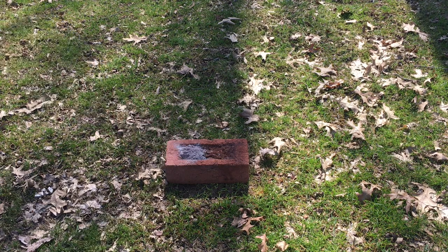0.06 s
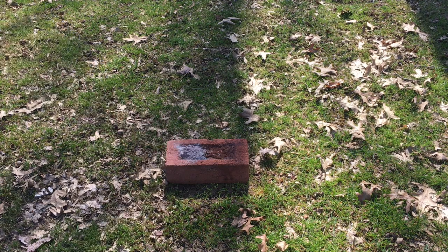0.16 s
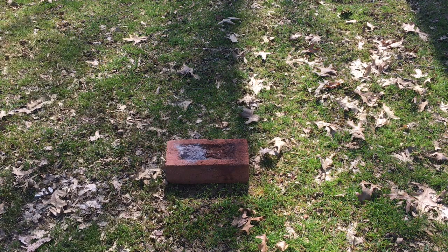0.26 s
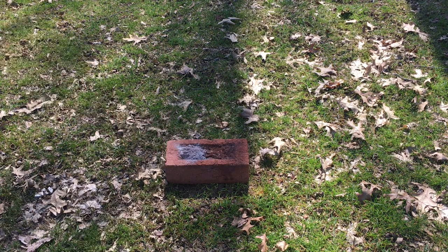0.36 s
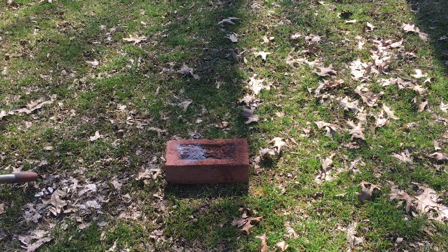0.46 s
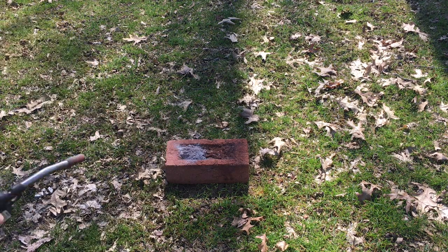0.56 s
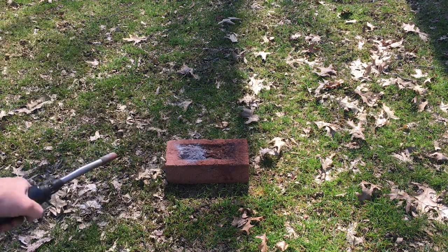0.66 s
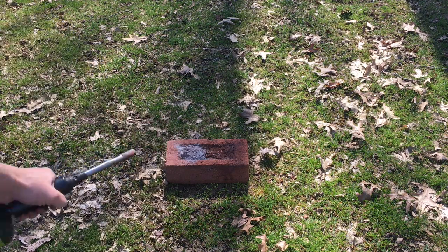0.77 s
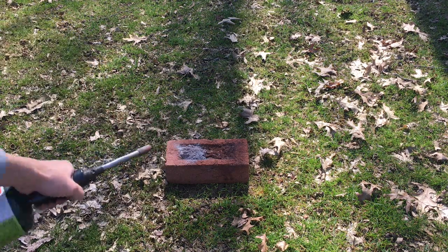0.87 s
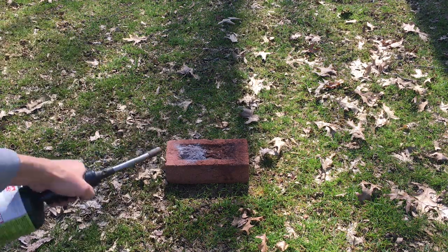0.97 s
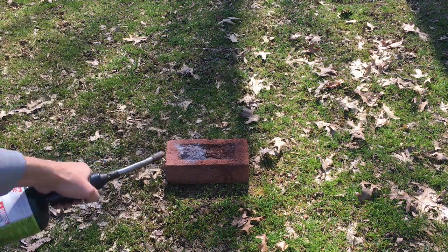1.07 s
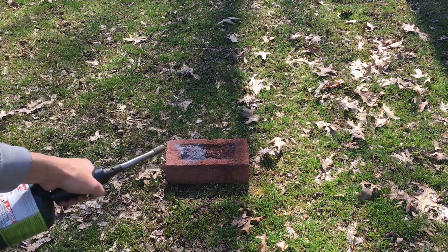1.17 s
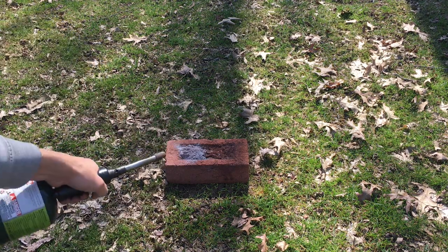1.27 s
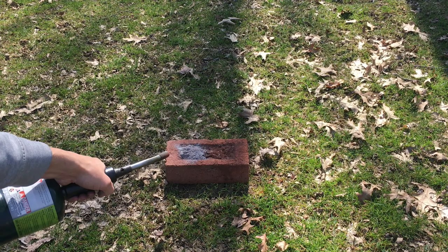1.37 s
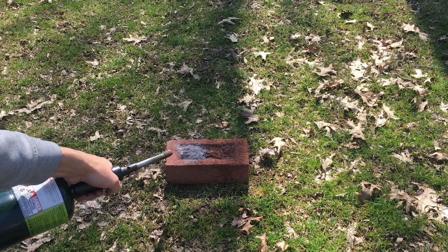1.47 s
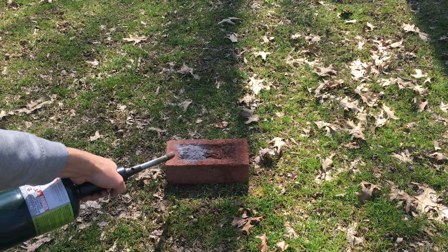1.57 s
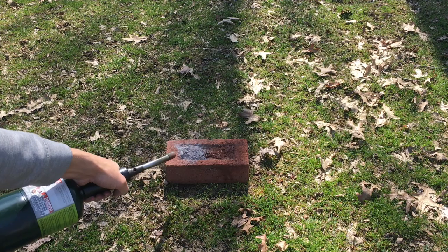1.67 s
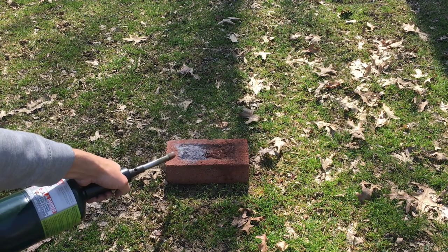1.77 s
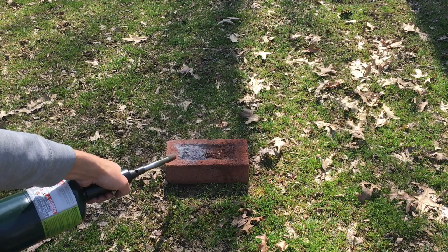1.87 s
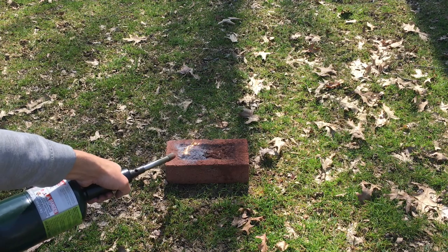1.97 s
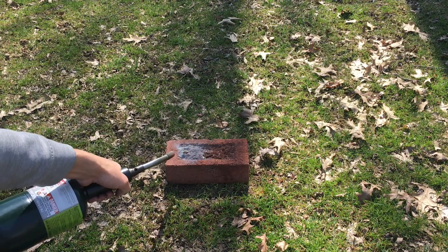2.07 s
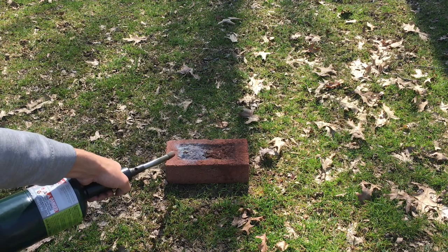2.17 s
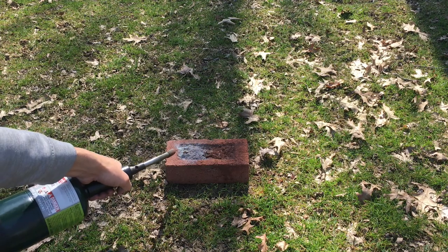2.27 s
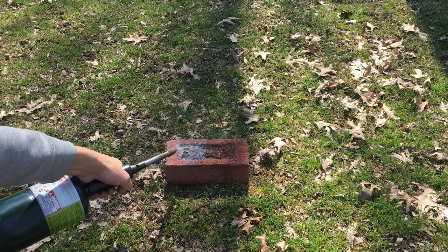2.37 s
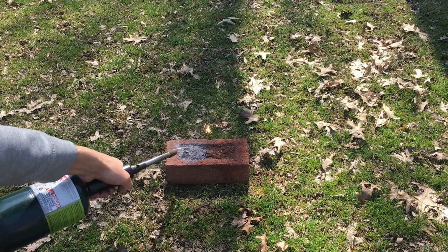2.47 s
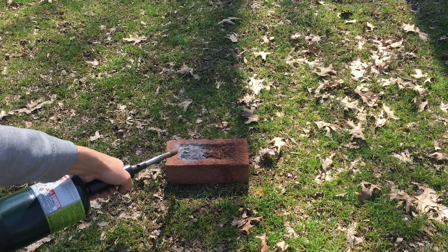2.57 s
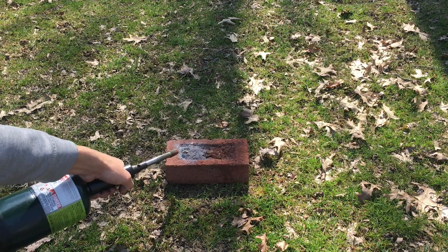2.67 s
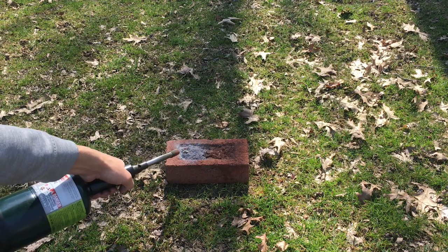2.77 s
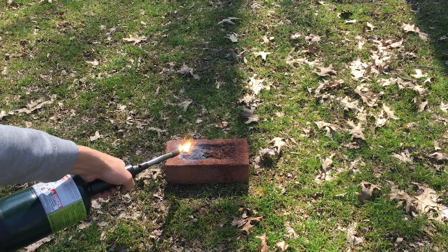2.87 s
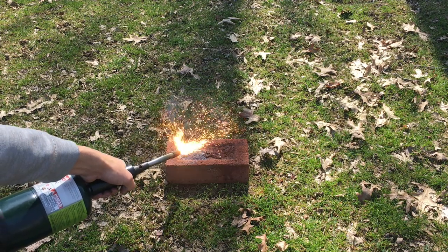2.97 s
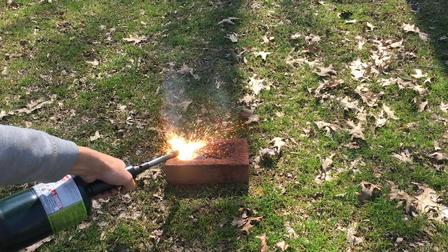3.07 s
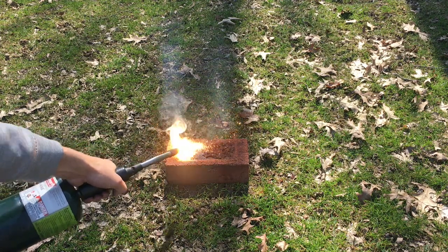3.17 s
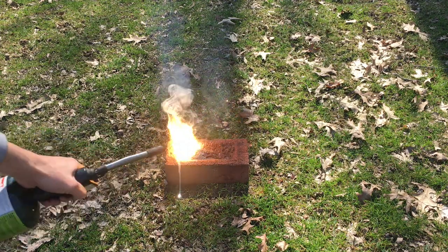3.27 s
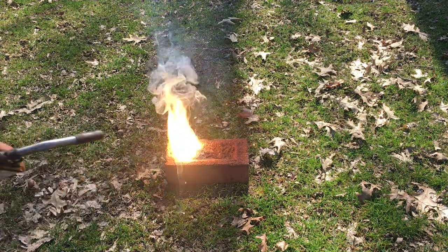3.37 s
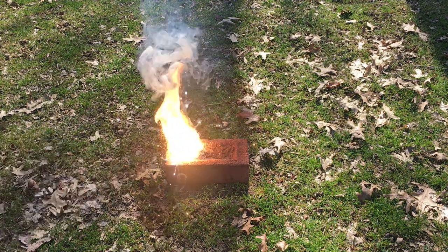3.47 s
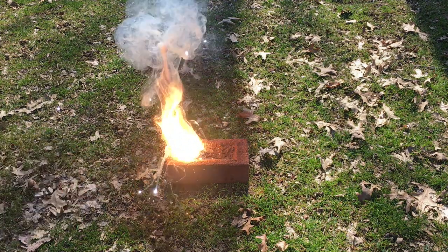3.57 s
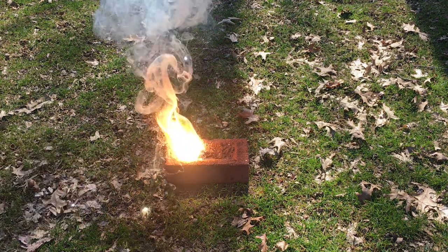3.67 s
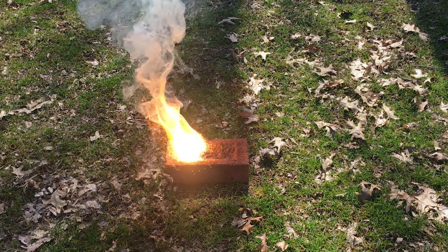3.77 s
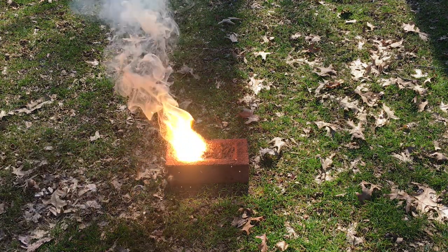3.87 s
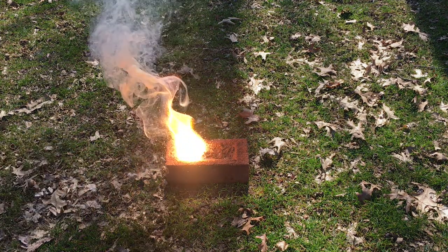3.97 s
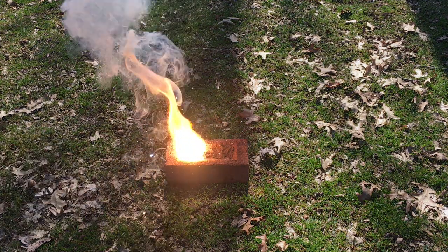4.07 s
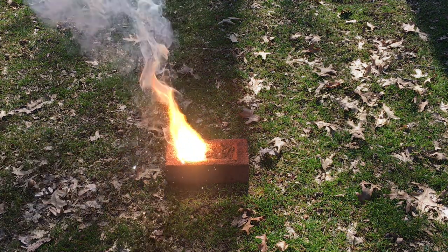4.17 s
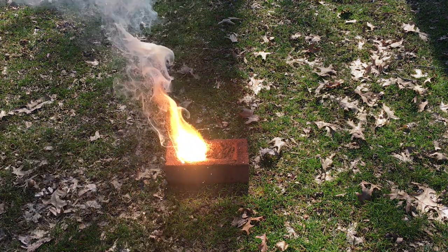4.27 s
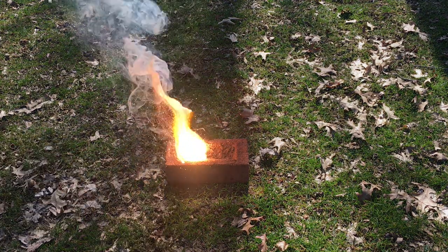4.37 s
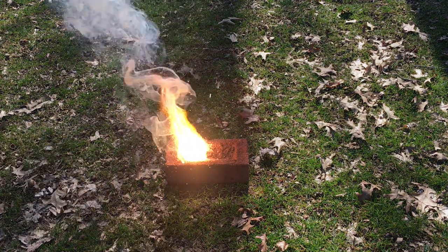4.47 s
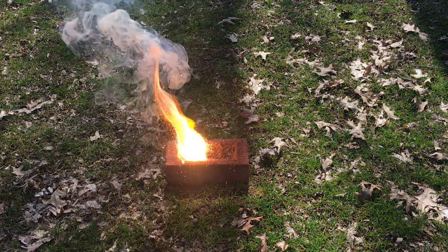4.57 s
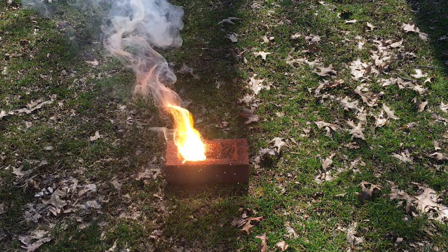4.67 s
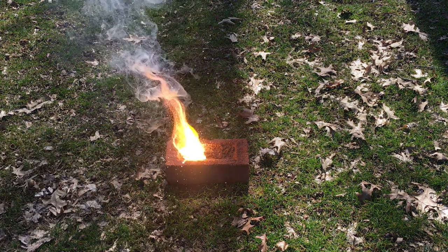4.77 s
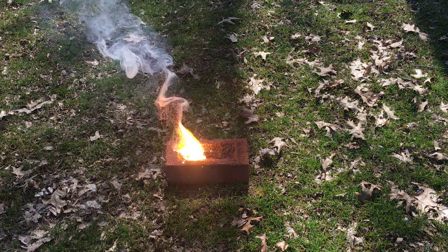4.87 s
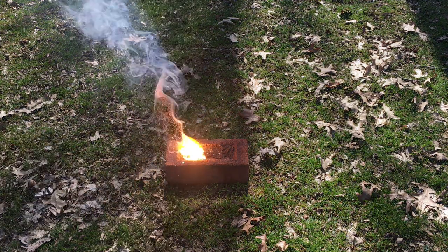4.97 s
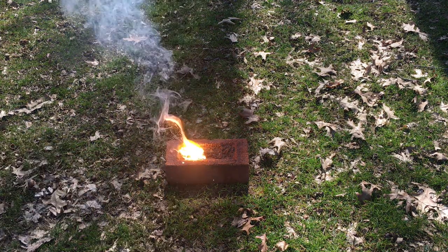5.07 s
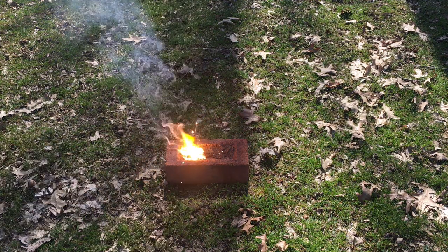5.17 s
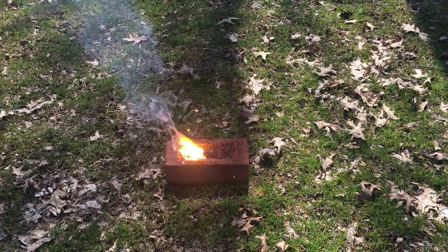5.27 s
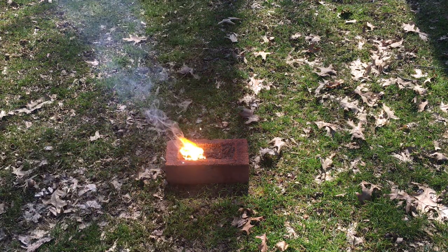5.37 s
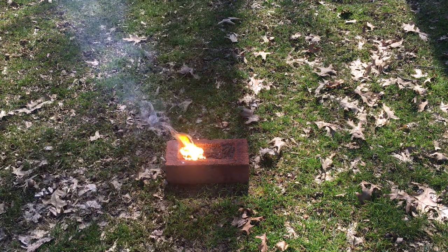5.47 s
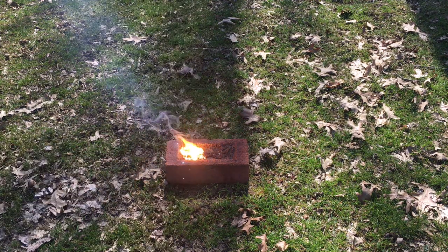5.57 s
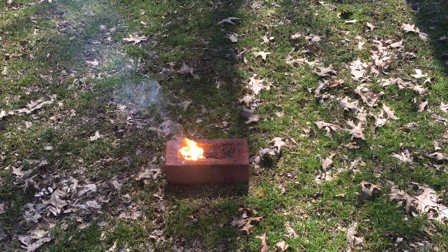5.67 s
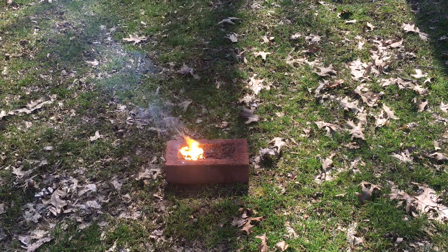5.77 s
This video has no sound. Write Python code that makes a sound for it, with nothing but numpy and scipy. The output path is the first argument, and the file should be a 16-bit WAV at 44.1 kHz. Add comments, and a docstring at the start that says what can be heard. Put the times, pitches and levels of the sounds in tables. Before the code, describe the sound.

Handling rustles, two igniter snaps, a steady torch roar, then a burst of cracking pops and hissing sparks that calms into bubbling crackle.

```python
"""Gas torch lights thermite on a lawn

A gas torch is picked up with rustles and knocks, hisses, is clicked twice and lights with a thump.
Its flame, turbulent noise ringing a burner tube, roars against a heap of thermite on a brick.
The powder catches: random clicks make the fizz, cracks with pressure pulses make the sharp pops.
It settles to a bubbling, crackling melt of uneven one-sided pulses, over a low outdoor rumble.
"""
import sys
import numpy as np
from scipy import signal
from scipy.fft import rfft, irfft
from scipy.io import wavfile
from scipy.ndimage import map_coordinates

SR = 44100
rng = np.random.default_rng(int(sys.argv[2]) if len(sys.argv) > 2 else 0)


def to_wav(sig):
    """Store sig (one row per channel, or 1-D mono) as 16-bit WAV at the path in sys.argv[1].

    Samples outside -1..1 are clipped; the rate is SR.
    """
    pcm = np.clip(np.atleast_2d(sig), -1, 1) * 32767
    pcm = np.round(pcm).astype(np.int16)
    wavfile.write(sys.argv[1], SR, pcm.T)  # frames by channels


N = 257103
T = np.arange(N) / SR
HZ = np.fft.rfftfreq(N, 1 / SR)

# squeezes of the gas trigger: opens t/s, closes t/s, level/dB
SQUEEZES = [(0.877, 1.09, -37), (1.191, 1.262, -34)]
VALVE_OPEN_S, VALVE_CLOSE_S, GAS_SAG_DB_PER_S = 0.084, 0.057, 43
WHISTLE_HZ, WHISTLE_GLIDE_HZ_PER_S, WHISTLE_DB = 5500, 1900, -45.5  # pitch as the valve opens

# the flame is lit, held on the heap, then turned away
LIT_S, AWAY_S, ROAR_DB, JET_DB = 1.25, 3.128, -30, -39.5
# speed of sound in the burner tube as a share of its hot value
COLD_SPEED, WARM_UP_S = .6, .39
# faint hum as the torch is drawn away; its octave is relative to the fundamental
HUM_HZ, HUM_DB, HUM_OCTAVE_DB, HUM_LENGTH_S = 143, -46, -8.5, 0.38

# the charge catches, flares up once, then burns down to a steady simmer
CATCH_S, GLITTER_END_S = 3.14, 4.8
SPREAD_S, MELTING_S = 0.31, 0.79  # time for the fire to cross the heap, and to melt it
SURGE_S, SURGE_HALF_S, SURGE_DB = 3.485, 0.14, -39
FIZZ_DB, FIZZ_FADE_DB_PER_S, FIZZ_SIMMER_DB = -41.5, 7.5, -54.5
MELT_DB, MELT_FADE_DB_PER_S, MELT_SIMMER_DB = -42.5, 26.5, -49.5
CALM_S, CALMING_S = 4.76, 1.15  # from here on the melt thickens into separate bubbles
SPITS_PER_S, SPITS_DB = 110, -5  # small random pops, level relative to the fizz
SPRAY_DECAY_S = 0.0026

AIR_DB = -43.5
EDGE_HZ = 15950  # upper band limit


def amp(db):
    """Decibels to gain."""
    return 10 ** (np.asarray(db) / 20)


def unit(x):
    """Scales to rms 1."""
    return x / np.sqrt(np.mean(x ** 2) + 1e-20)


def add(mix, s, sound):
    """Mixes a sound in at time s."""
    part = mix[max(round(s * SR), 0):][:len(sound)]
    part += sound[:len(part)]


def held(start, end, attack_s, release_s):
    """Envelope that rises from start, holds, and dies away after end."""
    rise = np.clip((T - start) / attack_s, 0, 1)
    return rise * np.exp(-np.maximum(T - end, 0) / release_s)


def swell(s, half_s):
    """Smooth rise and fall around time s."""
    return np.exp(-((T - s) / half_s) ** 2)


def colour(x, points):
    """Causal filter with the given spectrum, so clicks keep their sharp front; rms 1."""
    f, db = np.transpose(points)
    hz = abs(np.fft.fftfreq(4096, 1 / SR))
    log_gain = np.log(amp(np.interp(np.log(hz + 1), np.log(f), db)))
    # minimum phase: the phase follows from the log gain
    taps = np.fft.ifft(np.exp(np.conj(signal.hilbert(log_gain)))).real
    return unit(signal.oaconvolve(x, taps[:len(taps) // 2])[:N])


def ring(x, hz, width):
    """One resonance with gain 1 at its centre."""
    hz = min(hz, SR / 2 - 1000)
    return signal.lfilter(*signal.iirpeak(hz, hz / min(width, SR / 4), fs=SR), x)


def flutter(rate_hz, depth_db):
    """Random gain that wanders mostly below the given rate, by an rms depth in dB."""
    slow = irfft(rfft(rng.standard_normal(N)) / (1 + (HZ / rate_hz) ** 4), N)
    return amp(depth_db * unit(slow))


def sparks(per_s, spread_db):
    """Random clicks, mostly small and a few large; rms 1."""
    size = amp(spread_db * np.minimum(rng.exponential(1, N), 4.5))
    return unit(size * rng.choice([-1, 1], N) * (rng.random(N) < per_s / SR))


def echo(x, delay_ms, share, low_hz, high_hz):
    """Adds one near reflection that returns a band of the sound and combs it."""
    band = 1 / (1 + (HZ / high_hz) ** 4) / (1 + (low_hz / (HZ + 1)) ** 4)
    returned = irfft(rfft(x) * band, N)
    late = map_coordinates(returned, [np.arange(N) - delay_ms * SR / 1000], order=3)
    return x + share * late


def burn(glitter_db=-49, surge_glitter_db=-4, surge_melt_db=-13, plop_db=-5):
    """Sparks fizz over the seething melt; separate bubbles and ticks take over as it calms."""
    # spectra of the fizzing sparks and of the melt: f/Hz, relative level per Hz/dB
    fizz_spectrum = [(1500, -32), (3000, 5), (4500, -5), (6000, 4.5), (7700, -5), (9200, 2), (10500, -11),
                     (12000, -2), (14000, -31), (16000, -3)]
    melt_spectrum = [(150, -17), (400, -2), (650, -5.5), (820, -7), (1100, -1.5), (1600, 4), (2400, 2.5),
                     (3300, -7), (4800, -12), (9000, -29), (16000, -52)]
    # short sizzling flares: t/s, level/dB, f/Hz, half length/s
    flares = [(3.911, -41.5, 1070, 0.036), (4.024, -40.5, 1940, 0.096), (4.491, -39.5, 4300, 0.025)]
    alight = np.clip((T - CATCH_S) / SPREAD_S, 0, 1)
    molten = np.clip((T - CATCH_S) / MELTING_S, 0, 1)
    calm = np.clip(0.071 + 0.83 * np.clip((T - CALM_S) / CALMING_S, 0, 1), 0, 1)
    surge = amp(SURGE_DB) * swell(SURGE_S, SURGE_HALF_S)

    fizz_db = np.maximum(FIZZ_DB - FIZZ_FADE_DB_PER_S * (T - CATCH_S), FIZZ_SIMMER_DB)
    fizz_gain = np.hypot(alight * amp(fizz_db), surge)
    melt_db = np.maximum(MELT_DB - MELT_FADE_DB_PER_S * np.maximum(T - CALM_S, 0), MELT_SIMMER_DB)
    melt_gain = amp(surge_melt_db) * surge + molten * amp(melt_db)

    dense_and_sparse = np.sqrt(1 - calm) * sparks(9000, 1.9) + np.sqrt(calm) * sparks(600, 3.1)
    fizz = colour(dense_and_sparse, fizz_spectrum) * flutter(75, 3.2)
    spits = amp(SPITS_DB) * unit(ring(sparks(SPITS_PER_S, 1.2), 3500, 7000))
    # the finest sparks, only while it burns hard
    glitter = unit(ring(ring(sparks(5000, 5.6), 12000, 5500), 13500, 6500))
    melt = np.sqrt(1 - calm) * colour(sparks(3000, 3.56), melt_spectrum) * flutter(110, 1.6)
    bursts = bubbles()
    melt += np.sqrt(calm) * colour(bursts, melt_spectrum)
    melt += calm * amp(plop_db) * unit(ring(bursts, 350, 700))

    out = ((fizz + spits) * fizz_gain + melt * melt_gain) * flutter(16, 1.0)
    glitter_gain = amp(glitter_db) * held(CATCH_S, GLITTER_END_S, .08, .18)
    out += glitter * (glitter_gain + amp(surge_glitter_db) * surge)
    for s, db, hz, half in flares:
        sizzle = unit(ring(ring(sparks(5000, 3.9), hz, hz), hz, hz))
        out += amp(db) * sizzle * swell(s, half)
    return out


def bubbles(median_per_s=85, spread_db=4.5):
    """Gas bursts through the melt in an uneven run of one-sided pulses."""
    gap, size = rng.standard_normal((2000, 2)).T
    at = (np.cumsum(np.exp(.5 * gap)) / median_per_s * SR).astype(int)
    height = amp(spread_db * np.clip(size, -2, 1.3))
    inside = at < N
    return np.bincount(at[inside], height[inside], N)


def pops(crack_hz=7500, body_db=-7):
    """Each pop is a sharp crack, a short pressure pulse and a spray of sparks."""
    # pops: t/s, crack level/dB, pulse length/ms, spark spray before its filter, re crack/dB
    pop_list = [(3.152, -16, 0.039, -18), (3.233, -14, .05, -11), (3.3503, -15, 0.13, -5.5),
                (3.3776, -16, 0.1, -12), (3.459, -19, 0.2, -5), (3.4657, -16, .07, -10),
                (3.484, -5.5, 0.095, -12), (3.4917, -8, 0.036, -12), (3.4943, -8, .03, -9),
                (3.5118, -5, 0.016, -23), (3.5412, -6, 0.022, -12.5), (3.5464, -18, 0.037, -15),
                (3.5768, -18, 0.031, -11), (3.581, -10, 0.018, -33), (3.6978, -15.5, 0.054, -13),
                (3.8507, -2, 0.21, -20), (3.8838, -18, 0.12, -13), (4.1048, -11, 0.18, -17),
                (4.109, -5.5, 0.038, -10), (4.1679, 6.5, 0.45, -18), (4.2802, -21, 0.19, -8),
                (4.3802, -21, .04, -12), (4.5482, -19, 0.033, -13), (4.6701, -25, .08, -16),
                (4.7115, -23.5, .12, -6), (4.7903, -18, .13, -20), (4.794, -16, 0.22, -5.5),
                (4.8098, -24, .08, -8), (5.1817, -9.5, 0.1, -14.5), (5.2337, -26, 0.11, -18),
                (5.4907, -24, 0.11, -9.5), (5.511, -22.5, .068, -21), (5.5741, -25.5, 0.055, -7.5),
                (5.664, -20, .037, -15), (5.7046, -25, .087, -11), (5.7712, -24, 0.056, -13),
                (5.813, -25, .06, -15)]
    out = np.zeros(N)
    t = T[:SR // 12]
    cycles = t * crack_hz - 1.5
    crack = -np.cos(2 * np.pi * cycles) * np.exp(-(cycles / 0.42) ** 2)
    for s, db, length_ms, spray_db in pop_list:
        u = t / (length_ms / 1000)
        pulse = ring((1 - u) * np.exp(-u), 2600, 13000)  # overpressure, then a weaker suction
        body = amp(body_db) * pulse / abs(pulse).max()
        decay = np.exp(-t / SPRAY_DECAY_S) + 0.021 * np.exp(-t / 0.023)
        spray = ring(rng.standard_normal(len(t)) * decay, 5000, 14000)
        add(out, s, amp(db) * (crack + body + amp(spray_db) * spray))
    return out


def pushes():
    """Suddenly expanding gas gives a low thump of one or two swings."""
    # bursts that throw out a push of gas: t/s, level before decay/dB, f/Hz, decay time/s
    push_list = [(1.2483, -6.5, 165, 0.003), (3.851, -30, 458, 0.0011), (4.1694, -14, 424, 0.00049)]
    out = np.zeros(N)
    t = T[:SR // 10]
    for s, db, hz, decay in push_list:
        add(out, s, -amp(db) * np.sin(2 * np.pi * hz * t) * np.exp(-t / decay))
    return out


def flame():
    """Turbulent roar and jet hiss; the tube's resonances and its end echo rise in pitch with the heat."""
    # spectra of roar (when hot) and hiss: f/Hz, relative level per Hz/dB
    roar_spectrum = [(60, -17), (140, -1), (330, 0), (480, -2), (640, -2.5), (800, -3), (1400, 1),
                     (2200, -8), (3400, -24), (4500, -30.5), (9000, -45)]
    hiss_spectrum = [(2500, -2.5), (3400, 2), (4300, -33), (5400, 4.5), (7000, 0.5), (9200, 3.5),
                     (10500, -8.5), (11600, 4.5), (13500, -15.5), (16000, -22)]
    # resonances of the hot burner tube: f/Hz, width/Hz, relative level/dB
    hot_modes = [(2190, 700, 9), (3410, 1050, 9.5), (4650, 140, 4), (5070, 28, 11), (5980, 300, 11),
                 (7500, 460, 6), (8970, 370, -2), (9860, 200, 1.5), (12000, 120, 6), (12600, 150, 8)]
    # broad resonances that sound until the tube is hot: f when hot/Hz, width when hot/Hz, level/dB
    young_modes = [(2380, 1440, -37), (4540, 1300, -38.5), (7900, 4300, -44)]
    cold = np.exp(-(np.maximum(T - LIT_S, 0) / WARM_UP_S) ** 1.5)
    # share of the hot speed of sound; only the young flame wavers
    heat = (1 - (1 - COLD_SPEED) * cold) * flutter(21.95, .14) ** cold
    eddies = rng.standard_normal(N)
    tube = unit(sum(amp(db) * ring(eddies, hz, width) for hz, width, db in hot_modes))
    young = sum(amp(db) * unit(ring(ring(eddies, hz, width), hz, width)) for hz, width, db in young_modes)
    roar = colour(rng.standard_normal(N), roar_spectrum)
    # cooler gas plays the same modes slower
    place = [np.cumsum(heat)]
    roar, tube, young = [map_coordinates(x, place, order=3, mode="wrap") for x in (roar, tube, young)]

    roar = roar * flutter(70, 0.79) * amp(ROAR_DB - 2.7 * cold) * held(LIT_S, AWAY_S, 0.041, 0.057)
    young *= np.sqrt(cold) * held(LIT_S, AWAY_S, 0.089, .055)
    hiss = amp(-5) * colour(rng.standard_normal(N), hiss_spectrum) + amp(-3 * cold) * tube
    hiss *= flutter(57, .52) * amp(JET_DB) * held(LIT_S, AWAY_S, 0.0041, 0.15)
    near = echo(roar + young + hiss, 0.35 / heat, 0.6, 40, 4100)  # tube end
    return echo(near, 3.117, 0.37, 320, 1950)  # off the ground


def igniter(chatter_s=0.0026, tail_s=0.0014, direct_db=-4, spring_db=13):
    """The hammer chatters for a few ms and rings the tube and its spring; the trigger pings on release."""
    # igniter snaps: t/s, rms level over the first 4 ms/dB, tube pitch factor, inner spring f/Hz
    snaps = [(0.953, -12, 1.015, 8360), (1.2449, -11.5, 1.104, 11570)]
    # tube modes struck by the hammer: f before the pitch factor/Hz, width/Hz, relative level/dB
    struck_modes = [(975, 78, 8), (1350, 280, 1), (2140, 77, 16), (3370, 140, 11), (5780, 670, 1.5),
                    (7100, 770, 2), (9770, 1200, 6), (11600, 250, 11)]
    out = np.zeros(N)
    t = T[:SR // 8]
    tube_band = signal.butter(2, [650, 13000], "bandpass", fs=SR, output="sos")
    for s, db, pitch, spring_hz in snaps:
        chatter = rng.choice([-1, 1], len(t)) * np.exp(-np.maximum(t - chatter_s, 0) / tail_s)
        blow = signal.sosfilt(tube_band, chatter)
        snap = amp(direct_db) * blow + amp(spring_db) * ring(blow, spring_hz, 260)
        snap += sum(amp(mode_db) * ring(blow, hz * pitch, width) for hz, width, mode_db in struck_modes)
        add(out, s, amp(db) * snap / snap[:SR // 250].std())
    ping = ring(rng.standard_normal(len(t)) * np.exp(-t / 0.0018), 8130, 130)
    add(out, 1.0905, amp(-23.5) * ping / abs(ping).max())
    return out


def gas(tube_db=-5, jet_db=-2, tube_law=0.82):
    """The cold jet hisses and sounds the tube, even at low flow; squeeze one adds a fuzzy, rising whistle."""
    # spectrum of the cold jet: f/Hz, relative level per Hz/dB
    jet_spectrum = [(300, -31), (900, -4.5), (3000, 1), (7000, 6.5), (12500, 0), (16000, -15)]
    # resonances of the cold burner tube: f/Hz, width/Hz, relative level/dB
    cold_modes = [(942, 63, 21), (1580, 64, 7), (2170, 32, 17.5), (2330, 50, 8), (3350, 160, 0),
                  (6700, 140, -4), (9550, 400, -4), (11800, 250, -1.5), (12950, 250, -1)]
    jet = colour(rng.standard_normal(N), jet_spectrum)
    tube = unit(sum(amp(db) * ring(jet, hz, width) for hz, width, db in cold_modes))
    out = np.zeros(N)
    for opens, closes, db in SQUEEZES:
        sag = amp(-GAS_SAG_DB_PER_S * np.maximum(T - opens, 0))
        flow = held(opens, closes, VALVE_OPEN_S, VALVE_CLOSE_S) * sag
        out += amp(db) * (amp(jet_db) * jet * flow + amp(tube_db) * tube * flow ** tube_law)

    opens = SQUEEZES[0][0]
    pitch = WHISTLE_HZ + WHISTLE_GLIDE_HZ_PER_S * (T - opens)
    # slow complex noise blurs the tone into a narrow band
    noise = rng.standard_normal(N) + 1j * rng.standard_normal(N)
    fuzz = signal.sosfilt(signal.butter(2, 130, fs=SR, output="sos"), noise)
    whistle = unit((fuzz * np.exp(2j * np.pi * np.cumsum(pitch) / SR)).real)
    return out + whistle * amp(WHISTLE_DB) * held(opens, 1.04, 0.036, 0.047)


def handling(sleeve_db=-61, leaves_db=-67):
    """Grainy rustle, a sliding sleeve, small dead knocks and one faint ring of the bottle."""
    # spectrum of the rustle: f/Hz, relative level per Hz/dB
    rustle_spectrum = [(290, -50), (500, -12), (784, -5), (1160, -13), (1670, -9.5), (2890, -11),
                       (3250, -11), (6420, -11), (16000, -16.5)]
    # strokes of sleeve and leaves as the torch is lifted: start t/s, end t/s, level/dB
    stroke_list = [(0, 0.069, -50.5), (0.168, 0.265, -53.5), (0.335, 0.392, -52), (0.466, .503, -44.5)]
    # knocks and ticks of the torch and its trigger: t/s, peak level/dB, centre f/Hz, decay time/s
    knocks = [(.029, -33, 1950, .0025), (.045, -32, 2380, .0049), (.189, -34.5, 2430, .0011),
              (.213, -34.5, 1360, 0.0045), (.232, -27.5, 7800, .0015), (.474, -30.5, 845, 0.0025),
              (.495, -26.5, 6130, .0034), (.592, -23.5, 1290, 0.0014), (.592, -30.5, 9050, .0009),
              (0.677, -39.5, 6000, .003), (0.875, -30.5, 2500, 0.0031), (0.881, -31, 1240, 0.014),
              (1.091, -27.5, 1550, 0.0048), (1.184, -35, 2570, 0.0022), (1.1948, -29.5, 1670, 0.0044),
              (1.3963, -19, 8000, .001)]
    # modes of the gas bottle: f/Hz, width/Hz, relative level/dB
    bottle_modes = [(990, 28, 2.5), (1610, 8.7, -5), (2370, 16, 0)]
    moving = held(0.13, SQUEEZES[0][0], 0.036, .03)
    strokes = sum(amp(db) * held(start, end, 0.0052, 0.0093) for start, end, db in stroke_list)
    out = colour(sparks(6000, 5.1), rustle_spectrum) * (strokes + amp(leaves_db) * moving)
    sleeve = unit(ring(ring(rng.standard_normal(N), 1600, 2200), 1300, 5800))
    out += sleeve * amp(sleeve_db) * moving
    t = T[:SR // 4]
    for s, db, hz, decay in knocks:
        blow = rng.standard_normal(len(t)) * np.exp(-t / decay)
        knock = ring(ring(blow, hz, 0.7 * hz), hz, 3.2 * hz)
        add(out, s, amp(db) * knock / abs(knock).max())
    bottle = sum(amp(db) * np.sin(2 * np.pi * hz * t) * np.exp(-np.pi * width * t)
                 for hz, width, db in bottle_modes)
    add(out, .044, amp(-46) * bottle)
    return out


def outdoors():
    """Steady low rumble of the open air, with a faint hum that passes as the torch is drawn away."""
    # spectrum of the outdoor background: f/Hz, relative level per Hz/dB
    air_spectrum = [(20, -46), (40, -5.5), (60, 2), (105, -1), (150, -8), (230, -12), (350, -18.5),
                    (700, -33.5), (2000, -32), (6000, -43), (16000, -44)]
    turns = np.cumsum(HUM_HZ * flutter(13.7, 0.11)) / SR
    octave = amp(HUM_OCTAVE_DB) * np.sin(2 * np.pi * 2 * turns)
    hum = unit(np.sin(2 * np.pi * turns) + octave) * flutter(13, 1.5)
    air = amp(AIR_DB) * colour(rng.standard_normal(N), air_spectrum)
    return air + amp(HUM_DB) * hum * held(AWAY_S, AWAY_S + HUM_LENGTH_S, .09, .13)


def scene():
    """Torch and charge in the open, a short reflection on the burning charge; both channels alike."""
    charge = echo(burn(), 1.74, 0.25, 3200, 7500) + pops()
    mono = outdoors() + handling() + gas() + igniter() + flame() + charge + pushes()
    return np.array([mono, mono])


def record(dry):
    """The microphone's bass roll-off, brief dropouts, clipping at full scale, and the band limit."""
    # the sound drops out briefly either side of the biggest pop: from t/s, to t/s, depth/dB
    dropouts = [(4.145, 4.1684, -42), (4.191, 4.2398, -47)]
    heard = signal.sosfilt(signal.butter(3, 38, "highpass", fs=SR, output="sos"), dry)
    gap_db = sum(db * np.clip(np.minimum(T - start, end - T) / 0.0037, 0, 1) for start, end, db in dropouts)
    heard = np.clip(heard * amp(gap_db), -1, 1)
    lowpass = signal.firwin(401, EDGE_HZ, window=("kaiser", 9), fs=SR)
    return signal.oaconvolve(heard, lowpass[None], "same")


dry = scene()
out = record(dry)
to_wav(out)
```